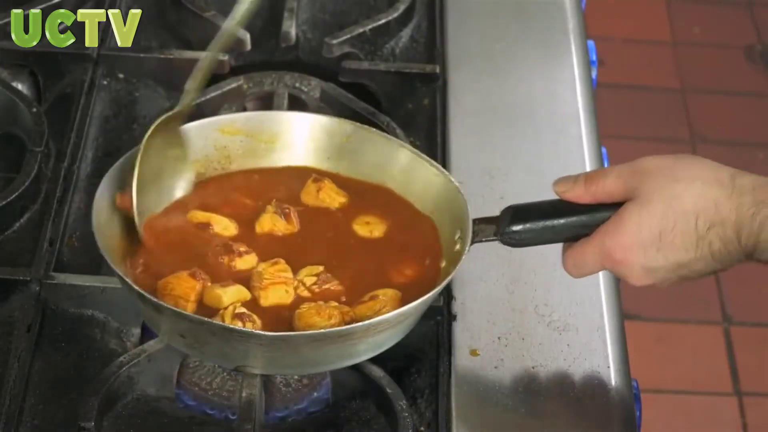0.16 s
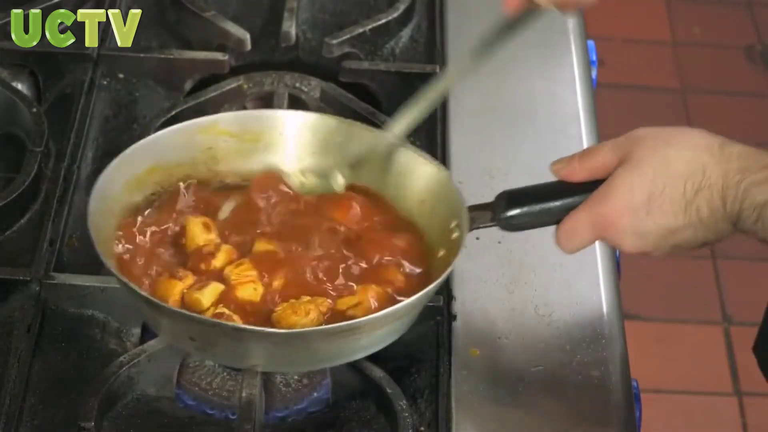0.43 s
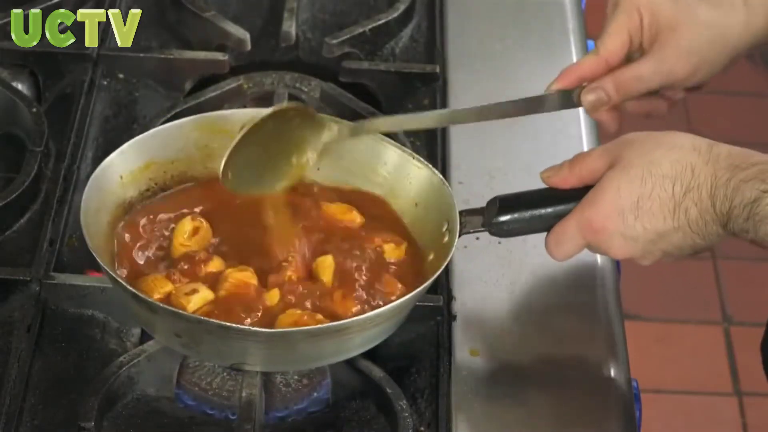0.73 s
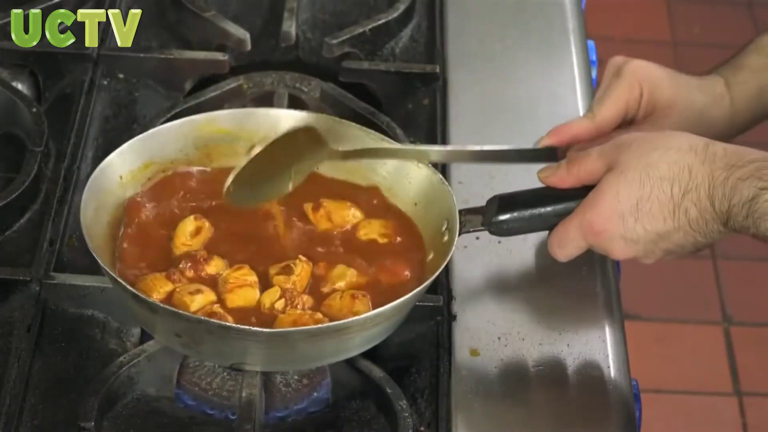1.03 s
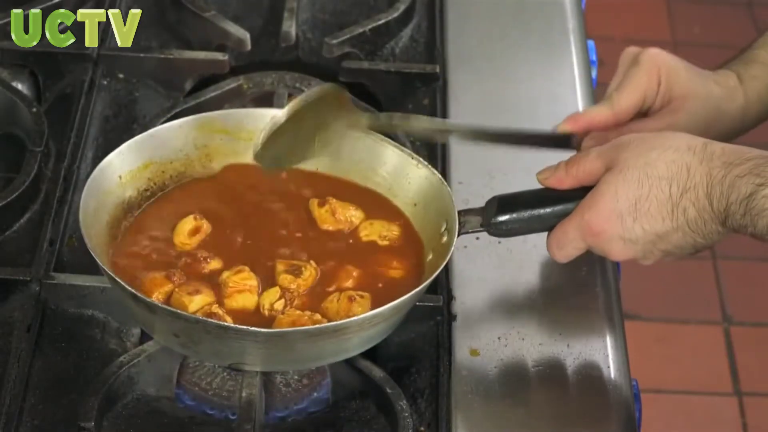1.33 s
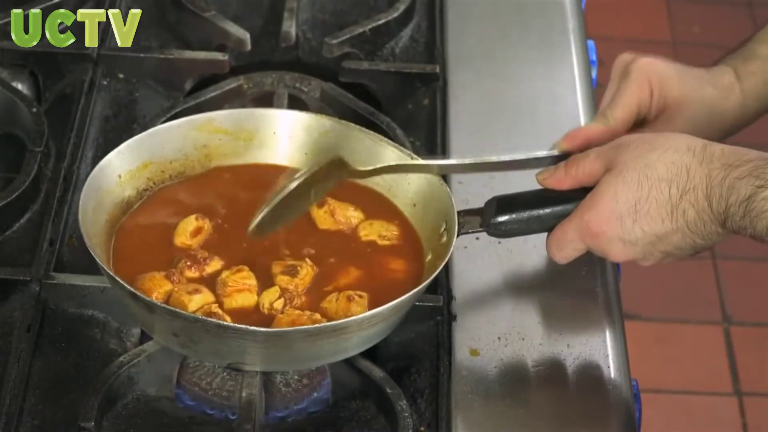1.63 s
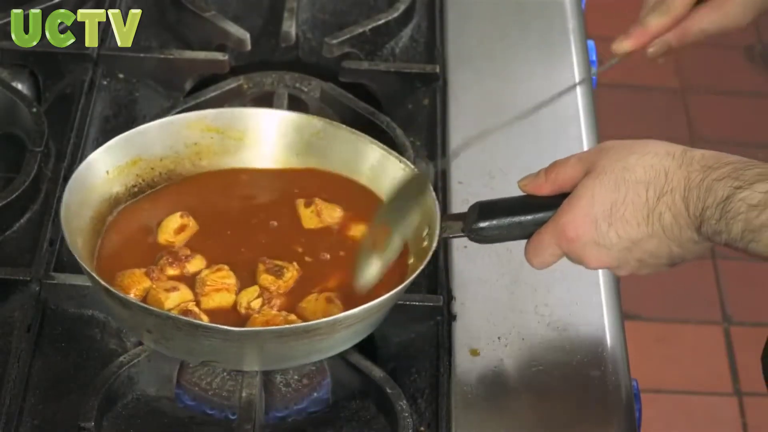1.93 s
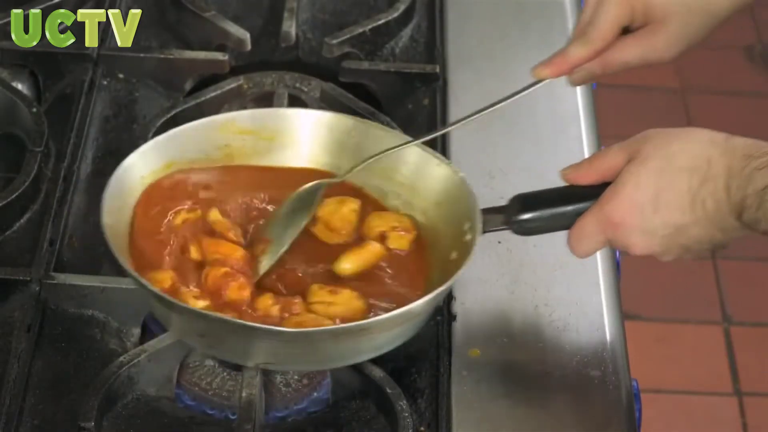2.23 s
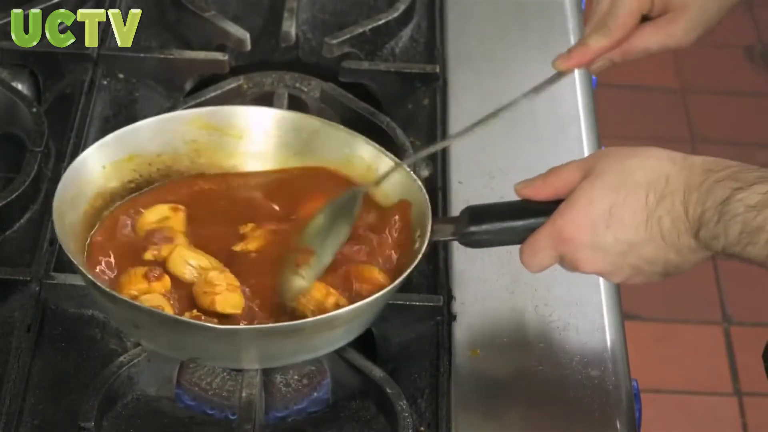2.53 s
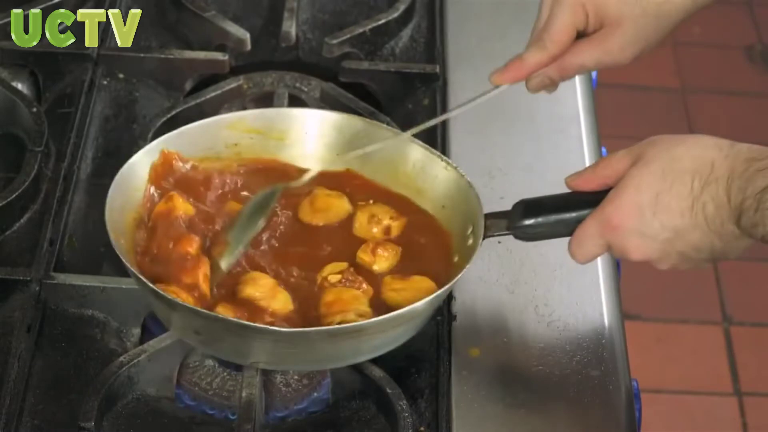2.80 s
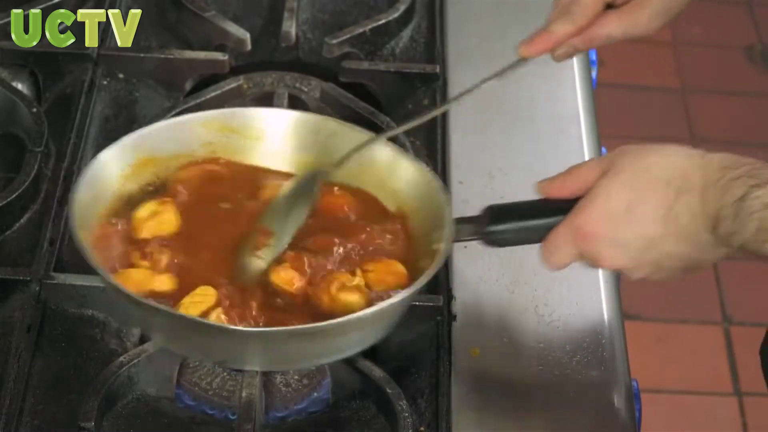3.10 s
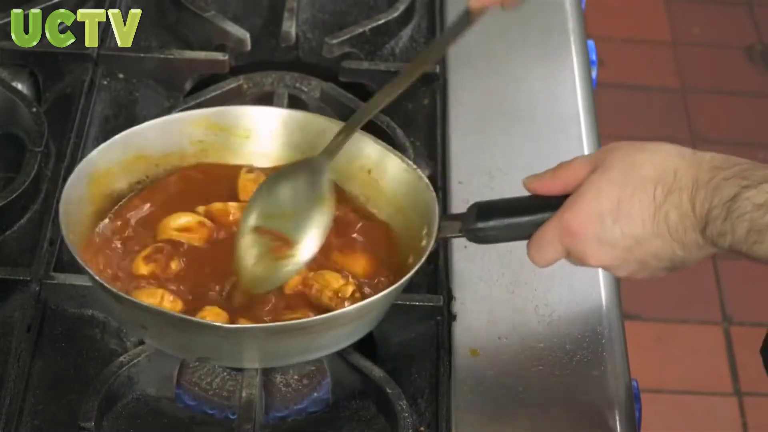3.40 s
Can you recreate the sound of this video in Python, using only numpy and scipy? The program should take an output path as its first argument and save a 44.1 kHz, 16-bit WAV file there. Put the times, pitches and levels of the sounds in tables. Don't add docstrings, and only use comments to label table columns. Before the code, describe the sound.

A metal spoon scrapes a steel frying pan in short, light, catching strokes until 0.5 s, then knocks dully at 0.7. Four clear rim taps ring at about 1.05, 1.25, 1.47 and 1.7, the first two with a tiny falling-pitch bounce. A hard, damped knock at 2.1 leads into louder scraping bursts until 3.3, then a knock at 3.4. Faint sizzle dips mid-way; low fan hum throbs throughout.

```python
import sys
import numpy as np
from scipy import signal
from scipy.fft import rfft, irfft
from scipy.io import wavfile
from scipy.ndimage import uniform_filter1d

SR = 44100
rng = np.random.default_rng(int(sys.argv[2]) if len(sys.argv) > 2 else 0)


def store_wav(level_fs):
    pcm = np.round(np.clip(np.atleast_2d(level_fs), -1, 1) * 32767)
    wavfile.write(sys.argv[1], SR, pcm.T.astype(np.int16))


def gain_from_db(level_db):
    decades = np.asarray(level_db, float) / 20
    return 10 ** decades


N = 156555

# f/Hz, level/dB
RUMBLE_COLOUR = [(25, -38), (60, -12), (150, -8.5), (230, -0.5), (450, -9), (900, -40), (3000, -75),
                 (15500, -54)]
# f/Hz, level/dB
HUM_OVERTONES = [(201.06, -58.5), (301.6, -60.5)]
RUMBLE_DB, HUM_DB, HUM_HZ = -51.5, -42, 100.53
THROB_HZ, THROB_AT_S, THROB_DEPTH, THROB_LOWER_SIDE = 6.46, 0.11, 0.14, 0.069
BEAT_HZ, BEAT_AT_S, BEAT_DEPTH = 13.56, 0.072, 0.26

# t/s, level/dB
SIZZLE_LEVEL = [
    (0, -49.5),
    (.42, -46.5),
    (.58, -55),
    (.8, -57),
    (1.001, -60),
    (2.0, -63),
    (2.45, -51.5),
    (3.1, -52.5),
    (3.55, -52.5),
]
# f/Hz, level/dB
SIZZLE_COLOUR = [(150, -31), (400, 10), (1000, 0.5), (2800, -12), (6000, -13.5), (15400, -11), (16000, -37)]
# t/s, peak/dB, f/Hz
SPITS = [(0.0183, -36, 14700), (0.036, -41, 12900), (0.0615, -33.5, 14400), (0.134, -40, 12800),
         (0.2154, -38, 14600), (.2324, -42, 11500), (.297, -36.5, 10700), (0.314, -41, 14000),
         (0.779, -39, 5500), (.79, -44, 6300), (.8102, -48, 12100), (0.856, -44, 11000),
         (0.997, -42, 10400), (1.2064, -46, 12000), (3.356, -36, 9800), (3.458, -40, 14100),
         (3.499, -43, 11200), (3.5378, -40, 9550)]
POPS_PER_S, POP_DB, POP_SPREAD_DB = 300, -8, 4

# t/s, length/s, level/dB, first contact f/Hz, second contact f/Hz
STROKES = [(0.005, .11, -55.5, 2900, 1070), (0.151, 0.049, -46.5, 3230, 4670),
           (0.254, 0.035, -50.5, 2010, 3200), (0.329, 0.07, -40.5, 1574, 5800),
           (0.425, 0.048, -35.5, 1940, 4450), (2.167, 0.11, -35, 2030, 5740),
           (2.412, 0.15, -42.5, 2400, 1870), (2.561, 0.11, -54.5, 2260, 2000),
           (2.628, 0.091, -34, 2030, 2470), (2.715, 0.074, -48, 1500, 1750),
           (2.898, 0.037, -42, 2390, 3270), (2.934, 0.057, -34.5, 1930, 4000),
           (2.993, 0.054, -34.5, 1650, 2930), (3.133, 0.048, -41, 2860, 3860),
           (3.168, 0.035, -31.5, 1650, 2410), (3.203, 0.055, -33, 1770, 2500)]
# t/s, peak/dB, f/Hz
DRY_CATCHES = [(0.022, -40, 2820), (0.028, -33, 2750), (0.1067, -34, 2770), (0.154, -33, 2940),
               (0.169, -39, 2820), (0.1729, -27, 1510), (0.187, -28, 1600), (0.2106, -32, 1570),
               (0.261, -25, 2020), (0.28, -35, 2000), (0.3474, -25, 3100), (0.4302, -26.5, 1510)]
# t/s, peak/dB, f/Hz
WET_CATCHES = [(2.1923, -26, 1830), (2.2155, -27, 1610), (2.2188, -23, 3010), (2.2312, -27, 1680),
               (2.2463, -22, 2410), (2.2536, -18, 2390), (2.2835, -30, 1060), (2.413, -40, 2200),
               (2.4235, -32, 2200), (2.4448, -32, 2170), (2.4528, -25, 2240), (2.4572, -31, 1890),
               (2.4705, -26, 2450), (2.479, -25, 2390), (2.4847, -29, 2480), (2.4903, -29, 2410),
               (2.5056, -27, 1720), (2.5203, -35, 2450), (2.5727, -40, 2130), (2.6513, -25, 2200),
               (2.6629, -26, 2410), (2.6667, -24, 2050), (2.6711, -22, 1980), (2.6778, -21, 2090),
               (2.6818, -20, 2500), (2.6901, -15, 2430), (2.7028, -19, 2450), (2.7064, -14, 2350),
               (2.7112, -23, 2430), (2.734, -32, 1080), (2.8991, -27, 2350), (2.9041, -29, 2350),
               (2.9172, -21, 2330), (2.9236, -27, 2300), (2.9432, -16, 2300), (2.9483, -21, 2390),
               (2.9796, -20, 3660), (3.0023, -25, 2630), (3.0064, -21, 1660), (3.0147, -16, 2690),
               (3.0232, -18, 1570), (3.029, -22, 2690), (3.0414, -27, 2670), (3.0535, -21, 2930),
               (3.149, -26, 2760), (3.1536, -23, 2800), (3.1618, -21, 2350), (3.1705, -20, 2370),
               (3.1777, -13, 1640), (3.1889, -17, 1590), (3.209, -17, 1660), (3.2156, -15, 1700),
               (3.2252, -19, 2450), (3.2328, -18, 2110), (3.2432, -13, 2610), (3.2589, -23, 2910),
               (3.278, -33, 1610), (3.3267, -32, 2520)]
# t/s, length/s, level/dB
SINGING = [
    (2.25, 0.047, -39),
    (2.68, 0.071, -39),
    (3.155, 0.017, -49),
    (3.199, 0.049, -33.5),
]
# f/Hz, width/Hz, level/dB
BOWL_MODES = [(1051, 22, 10.5), (1650, 58, 17.5), (2100, 6.3, -1), (2280, 86, -4), (2820, 32, 7),
              (3060, 72, 8), (3980, 71, -9.5)]
# f/Hz, level/dB
SCRAPE_COLOUR = [(60, -60.5), (300, 1), (800, -19), (2400, -5.5), (5000, -13), (10000, -23), (15000, -36)]
BOWL_DB, SING_HZ = -14, 1068
SLIPS_PER_S, SLIP_SPREAD_DB = 1100, 3
STROKE_DB, STROKE_RISE, STROKE_FALL = -2.5, 0.36, 0.43
DRY_UNTIL_S, DRY_TILT_DB_PER_OCT = 1, 3
CONTACT_DB, CONTACT_DRY_CUT_DB, CONTACT_WIDTH_HZ = 2.5, 4.7, 240
CATCH_DB, CATCH_RING_DB, CATCH_WIDTH_HZ = 4.5, 7, 280
CATCH_UPPER_DB, CATCH_UPPER_RATIO = 1, 1.9

# t/s, peak/dB, tilt/dB per octave, ring length factor
KNOCKS = [
    (0.689, -6, -4.1, 0.94),
    (0.712, -22.5, -6, 0.42),
    (2.09, -8, 6.5, 0.74),
    (2.108, 1, 3.5, 0.96),
    (3.381, -9.5, -1.5, 0.89),
    (3.417, -17.5, -7, 0.81),
]
# f/Hz, level/dB
KNOCK_COLOUR = [(88, -36.5), (150, -9.5), (1500, -11), (1980, -3), (3620, -13), (4160, -9), (6500, -17),
                (9000, -23.5), (16000, -38.5)]
# f/Hz, t60/s
KNOCK_T60 = [(200, 0.044), (1000, 0.19), (2000, 0.078), (5000, 0.01), (15000, 0.06)]
# f/Hz, level/dB, t60/s
FLOOR_RINGS = [(1500, -2, 0.087), (1900, 14.5, 0.036), (2400, 9, 0.051), (4206, 1, 0.037),
               (5260, -2.5, 0.024)]
KNOCK_RISE_S, FLOOR_RINGS_DB = 0.0014, -13.5

# t/s, peak/dB, tilt/dB per octave, ring length factor
TAPS = [
    (1.045, -13, 0.03, 0.95),
    (1.253, -9.5, 0.84, 0.89),
    (1.473, -9.5, 0.55, 0.86),
    (1.71, -8.5, 1.33, 1),
]
# f/Hz, level/dB
TAP_COLOUR = [(71, -41.5), (120, -10), (1290, -2.5), (1430, -1.5), (4140, -14.5), (5750, -12.5),
              (10400, -20), (14200, -28), (16000, -27.5)]
# f/Hz, t60/s
TAP_T60 = [(150, 0.44), (600, 0.23), (2000, 0.23), (4000, 0.25), (7000, 0.3), (15000, .22)]
# f/Hz, level/dB, t60/s
TAP_RINGS = [(902, 4, 0.24), (1015, -0.5, 0.26), (1090, -3, 0.083), (1186, 4.5, 0.19), (1407, 4, 0.2),
             (2033, 8, 0.17),
             (651, 2.5, 0.18), (3980, 2.5, 0.092), (4300, -13, 0.069), (5360, -10, 0.14),
               (5900, -0.5, 0.18), (6490, 0.5, 0.14), (7620, -10.5, 0.31), (7800, -1, 0.073),
               (10280, -7.5, 0.26), (10800, -14, 0.35), (12100, -8, .2), (13300, -14.5, 0.14)]
TAP_RISE_S, RIM_DB, MODE_SPREAD_DB = 0.0023, -14.5, 2

# t/s, peak/dB, from f/Hz, to f/Hz
BOUNCES = [
    (1.067, -6, 3047, 1600),
    (1.078, -13, 2156, 1930),
    (1.269, -26, 2110, 1440),
    (1.276, -11.5, 2880, 1720),
]
BOUNCE_S = 0.00398

# f/Hz, t60/s
ROOM_T60 = [(200, 0.32), (2000, 0.18), (12000, 0.29)]
ROOM_DB, NEAR_DB, TAPS_DB = -12.5, -4.5, 7.5
DUCK_FROM_DB, DUCK_SHARE, RECOVER_DB_PER_S, EDGE_HZ = -26, 0.48, 84, 15700


def evened(x):
    return x / np.sqrt(np.mean(x ** 2) + 1e-20)


def drift(count, width):
    return evened(uniform_filter1d(rng.standard_normal(count), size=width))


def read(points, hz):
    f, value = np.transpose(points)
    return np.interp(np.log(hz + 1), np.log(f + 1), value)


def add(mix, s, sound):
    part = mix[round(s * SR):][:len(sound)]
    part += sound[:len(part)]


def coloured(x, colour, tilt_db=0):
    hz = np.fft.rfftfreq(2048, 1 / SR)
    tilt = tilt_db * np.log2(np.clip(hz, 300, None) / 2000)
    log_gain = np.log(gain_from_db(read(colour, hz) + tilt))
    fold = irfft(log_gain) * np.r_[1, 2 * np.ones(1023), 1, np.zeros(1023)]
    return signal.oaconvolve(x, irfft(np.exp(rfft(fold))))[:len(x)]


def ring(x, hz, width_hz):
    r, w = np.exp(-np.pi * width_hz / SR), 2 * np.pi * hz / SR
    resonance = signal.lfilter([1], [1, -2 * r * np.cos(w), r * r], x)
    return np.sqrt(4 * (1 - r)) * np.sin(w) * resonance


def noise(colour, patchy_db):
    a, b, patches = rng.standard_normal((N // 256 + 5, 513, 3)).T
    patches = uniform_filter1d(patches, size=12, axis=0)
    patches = evened(uniform_filter1d(patches, size=10, axis=1))
    level_db = read(colour, np.fft.rfftfreq(1024, 1 / SR))[:, None]
    z = (a + 1j * b) * gain_from_db(level_db + patchy_db * patches)
    return evened(signal.istft(z, nperseg=1024, noverlap=768)[1][:N])


def fan():
    t = np.arange(N) / SR
    throb = 2 * np.pi * THROB_HZ * (t - THROB_AT_S)
    beat = 2 * np.pi * BEAT_HZ * (t - BEAT_AT_S)
    shape = 1 + 2 * THROB_DEPTH * np.cos(throb)
    shape = shape + THROB_LOWER_SIDE * np.exp(-1j * throb) + BEAT_DEPTH * np.exp(-1j * beat)
    hum = gain_from_db(HUM_DB) * (shape * np.exp(2j * np.pi * HUM_HZ * t)).real
    for hz, db in HUM_OVERTONES:
        hum += gain_from_db(db) * np.sin(2 * np.pi * (hz * t + rng.random()))
    return np.sqrt(2) * hum + gain_from_db(RUMBLE_DB) * noise(RUMBLE_COLOUR, patchy_db=2)


def spits():
    out, t = np.zeros(N), np.arange(600) / SR
    for s, peak_db, hz in SPITS:
        tone = np.sin(2 * np.pi * hz * t) * np.exp(-t / 0.0007) * np.minimum(t / 0.0003, 1)
        puff = ring(rng.standard_normal(600) * np.exp(-t / 0.0018), hz, 2000)
        add(out, s, gain_from_db(peak_db) * (tone + 0.7 * puff / np.sin(2 * np.pi * hz / SR)))
    return out


def sizzle():
    level = gain_from_db(np.interp(np.arange(N) / SR, *np.transpose(SIZZLE_LEVEL)))
    size = gain_from_db(POP_SPREAD_DB * np.minimum(rng.exponential(1, N), 4))
    size = size * (rng.random(N) < POPS_PER_S / SR)
    pitch, pops = rng.integers(0, 16, N), np.zeros(N)
    for k, hz in enumerate(np.linspace(6000, 15200, 16)):
        pop = ring(size * (pitch == k), hz, 1500) / np.sin(2 * np.pi * hz / SR)
        pops += gain_from_db(read(SIZZLE_COLOUR, hz)) * pop
    hiss = noise(SIZZLE_COLOUR, patchy_db=2)
    return level * (hiss + gain_from_db(POP_DB) * evened(pops)) + spits()


def bowl(x, tilt_db):
    rings = sum(gain_from_db(db) * ring(x, hz, width) for hz, width, db in BOWL_MODES)
    return coloured(x, SCRAPE_COLOUR, tilt_db) * 10.9 + gain_from_db(BOWL_DB) * rings


def slip_train():
    sign = np.sign(rng.random(N) - 0.5)
    size = gain_from_db(SLIP_SPREAD_DB * np.minimum(rng.exponential(1, N), 3.1))
    slipped = rng.random(N) < SLIPS_PER_S / SR
    return sign * size * slipped * gain_from_db(0.92 * drift(N, 130))


def strokes(grit):
    out = np.zeros(N)
    for s, length, level_db, first_hz, second_hz in STROKES:
        dry_wall = s < DRY_UNTIL_S
        u = np.arange(int((length + 0.096) * SR)) / SR / length
        pressure = np.clip(np.minimum(u / STROKE_RISE, (1 - u) / STROKE_FALL), 0, 1)
        slips = grit[round(s * SR):][:len(u)] * pressure
        sound = evened(bowl(slips, DRY_TILT_DB_PER_OCT * dry_wall))
        contact_gain = gain_from_db(CONTACT_DB - CONTACT_DRY_CUT_DB * dry_wall)
        for hz in (first_hz, second_hz):
            contact = evened(ring(ring(slips, hz, CONTACT_WIDTH_HZ), hz, 430))
            sound = sound + contact_gain * min(2400 / hz, 1) ** 2 * contact
        add(out, s, gain_from_db(level_db + STROKE_DB) * evened(sound) * np.sqrt(1 + 0.087 / length))
    return out


def catches():
    out = np.zeros(N)
    for s, peak_db, hz in WET_CATCHES + DRY_CATCHES:
        z = rng.standard_normal(90)
        click = np.r_[z * np.exp(-np.arange(90) / 18), np.zeros(2500)]
        sound = evened(np.diff(bowl(click, -4), prepend=0))
        contact = ring(ring(click, hz, CATCH_WIDTH_HZ), hz, 1500)
        upper_hz = np.clip(hz, 2100, 2700) * (CATCH_UPPER_RATIO + z[-1] / 5)
        upper = ring(ring(click, 4500, 4000), upper_hz, 1000)
        sound = sound + gain_from_db(CATCH_RING_DB) * evened(contact) + gain_from_db(CATCH_UPPER_DB) * evened(upper)
        add(out, s, gain_from_db(peak_db + CATCH_DB) * sound / abs(sound).max())
    return out


def singing(grit):
    out = np.zeros(N)
    for s, length, level_db in SINGING:
        count = int(length * SR)
        slips = grit[round(s * SR):][:count] * np.hanning(count) ** 0.5
        slips = np.r_[slips, np.zeros(1500)]
        add(out, s, gain_from_db(level_db) * evened(ring(ring(slips, SING_HZ, 45), SING_HZ, 200)))
    return out


def scraping():
    grit = slip_train()
    return strokes(grit) + catches() + singing(grit)


def blows(rows, colour, t60s, rise_s, lines, lines_db):
    t, out = np.arange(110 * 128) / SR, np.zeros(N)
    hz = np.fft.rfftfreq(512, 1 / SR)[:, None]
    frame_s = np.arange(-2, 114) * 128 / SR
    for s, peak_db, tilt_db, length in rows:
        a, b = rng.standard_normal((2, 257, len(frame_s)))
        lumps, slow = drift(257, 5)[:, None], drift(257, 5)[:, None]
        field_t60 = read(t60s, hz) * length * gain_from_db(slow / 3)
        db = read(colour, hz) + MODE_SPREAD_DB * lumps + tilt_db * np.log2((hz + 100) / 2000)
        db = db - 60 * abs(frame_s) / field_t60
        body = signal.istft((a + 1j * b) * gain_from_db(db), nperseg=512, noverlap=384)[1][256:][:len(t)]
        body = body / np.sqrt(np.mean(body[:500] ** 2))
        chances = rng.standard_normal((len(lines), 3))
        for (f, line_db, t60), (size, off, turn) in zip(lines, chances):
            pair = np.sin(2 * np.pi * f * t + turn)
            pair = pair + 0.63 * np.sin(2 * np.pi * f * (1 + 0.0117 * off) * t)
            pair = pair * (1 + f / 8000 * drift(len(t), 150))
            ring_db = lines_db + line_db + 1.16 * size + 2 * tilt_db * np.log2(f / 2000)
            body = body + gain_from_db(ring_db - 60 * t / (t60 * length)) * pair
        rise = 1 - np.exp(-(t / rise_s) ** 2)
        fade = np.minimum((t[-1] - t) / 0.032, 1)
        add(out, s, gain_from_db(peak_db) * 0.33 * body * rise * fade)
    return out


def knocks():
    return blows(KNOCKS, KNOCK_COLOUR, KNOCK_T60, KNOCK_RISE_S, FLOOR_RINGS, FLOOR_RINGS_DB)


def taps():
    return blows(TAPS, TAP_COLOUR, TAP_T60, TAP_RISE_S, TAP_RINGS, RIM_DB)


def bounces():
    out, u = np.zeros(N), np.arange(1500) / SR / BOUNCE_S
    for s, peak_db, from_hz, to_hz in BOUNCES:
        hz = to_hz + (from_hz - to_hz) * np.exp(-0.5 * u ** 2.16)
        hz = hz * (1 + drift(len(u), 20) / 5)
        envelope = (1 - np.exp(-3 * u)) * np.exp(-u)
        add(out, s, gain_from_db(peak_db) * envelope * np.sin(2 * np.pi * np.cumsum(hz) / SR))
    return out


def kitchen(x):
    echoes = np.zeros(SR // 2)
    at = np.arange(300, SR // 2 - 20, 20)
    echoes[at + rng.integers(0, 20, len(at))] = rng.choice([-1., 1.], len(at))
    hz, t, z = signal.stft(echoes, SR, nperseg=256)
    decay = gain_from_db(-60 * t / read(ROOM_T60, hz)[:, None])
    tail = signal.istft(z * decay, SR, nperseg=256)[1]
    return signal.fftconvolve(x, tail / np.linalg.norm(tail))[:N]


def scene():
    near = knocks() + scraping()
    rim = (taps() + bounces()) * gain_from_db(TAPS_DB)
    near = near * gain_from_db(NEAR_DB) + gain_from_db(ROOM_DB) * kitchen(near)
    near = signal.lfilter(*signal.butter(2, 260, "high", fs=SR), near)
    return (rim + near + sizzle() + fan())[None]


def top_cut(x):
    return signal.sosfilt(signal.butter(12, 16490, fs=SR, output="sos"), x)


def record(dry):
    power_db = 10 * np.log10(abs(uniform_filter1d(dry[0] ** 2, size=440)) + 1e-12)
    fall_db = np.arange(N) * RECOVER_DB_PER_S / SR
    held_db = np.maximum.accumulate(power_db + fall_db) - fall_db
    over_db = np.maximum(held_db - DUCK_FROM_DB, 0)
    ducked = dry / gain_from_db(DUCK_SHARE * uniform_filter1d(over_db, size=200))
    lowpass = signal.firwin(numtaps=401, cutoff=EDGE_HZ, fs=SR)[None]
    return top_cut(signal.oaconvolve(ducked, lowpass, "same"))


dry = scene()
out = record(dry)
store_wav(out)
```